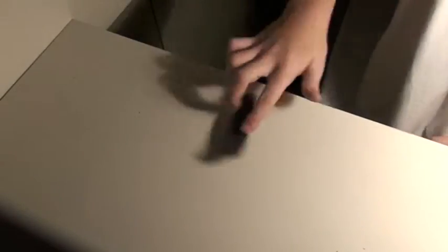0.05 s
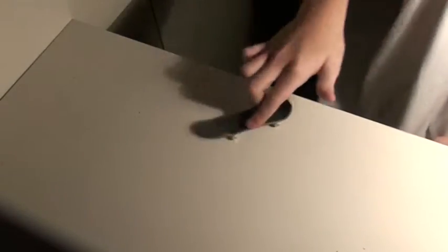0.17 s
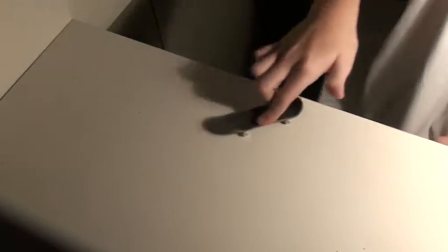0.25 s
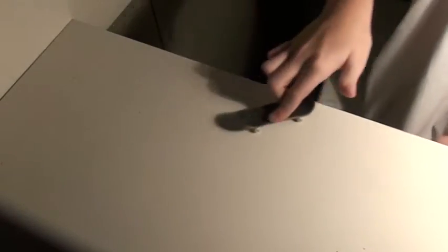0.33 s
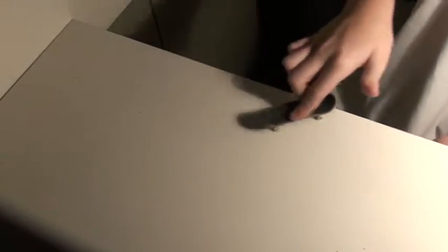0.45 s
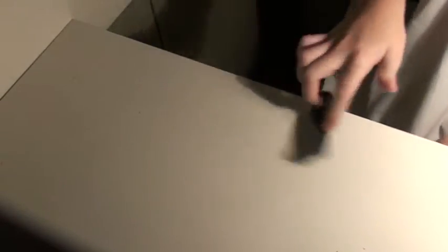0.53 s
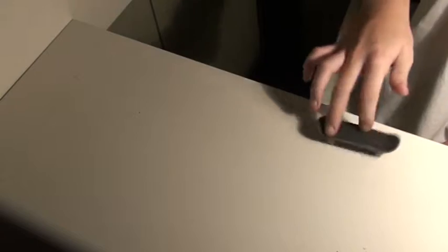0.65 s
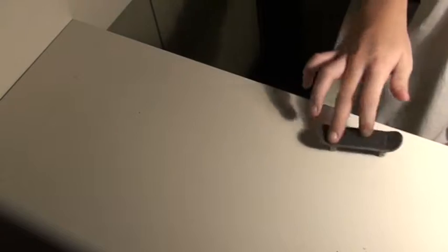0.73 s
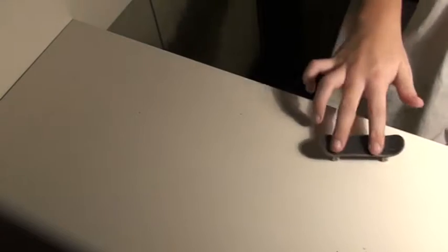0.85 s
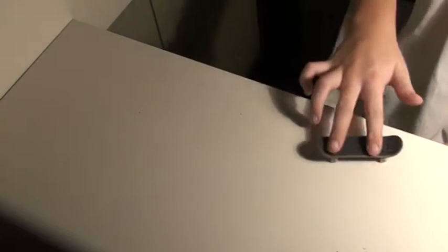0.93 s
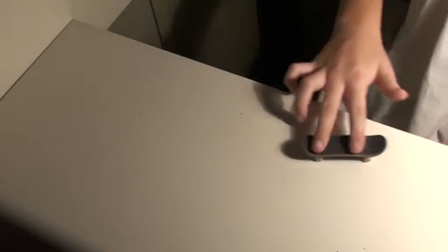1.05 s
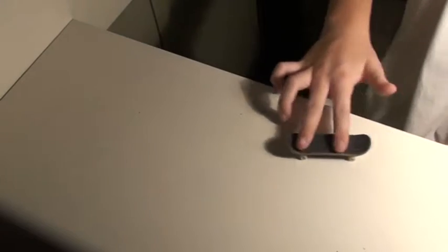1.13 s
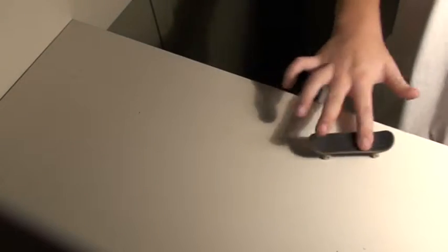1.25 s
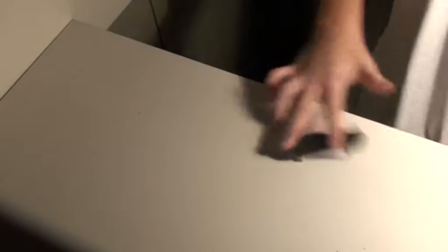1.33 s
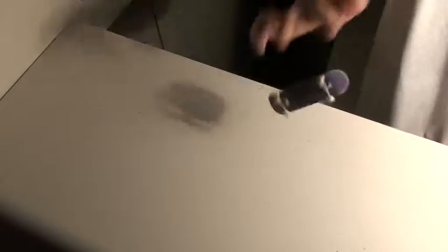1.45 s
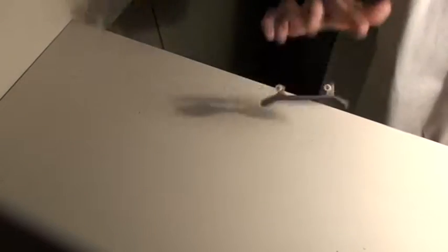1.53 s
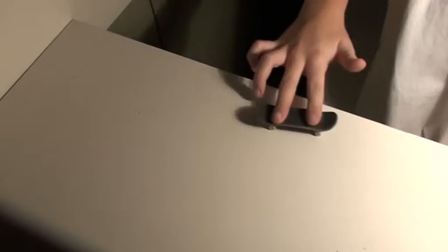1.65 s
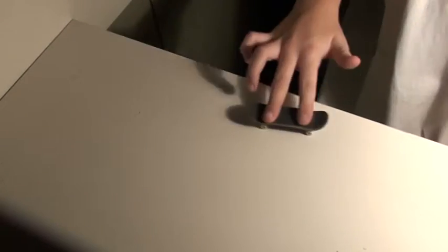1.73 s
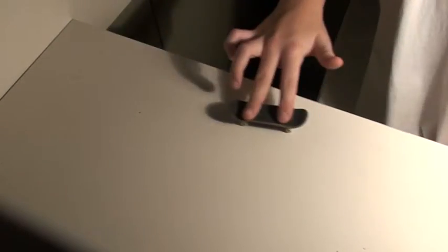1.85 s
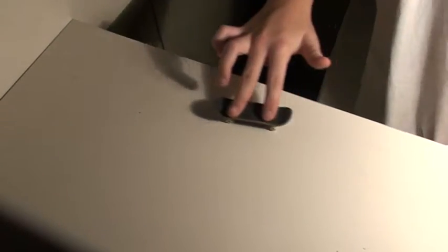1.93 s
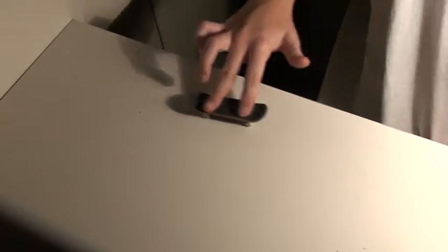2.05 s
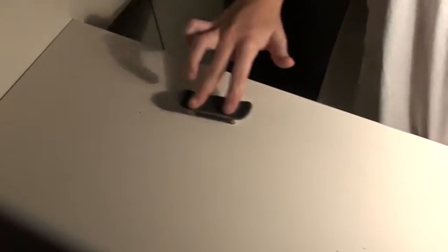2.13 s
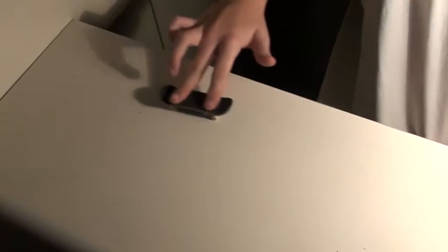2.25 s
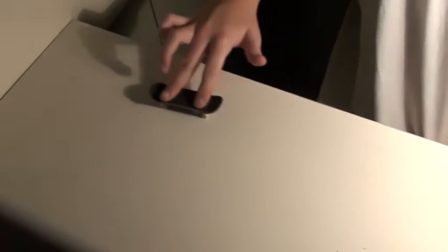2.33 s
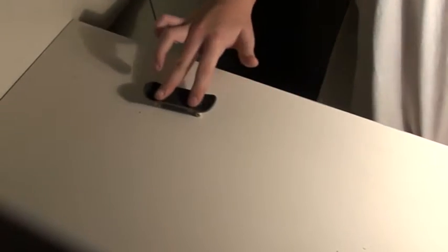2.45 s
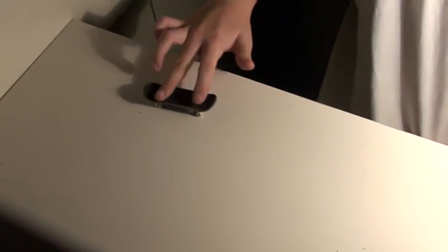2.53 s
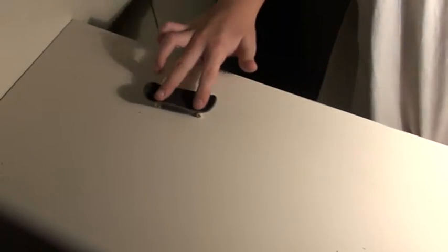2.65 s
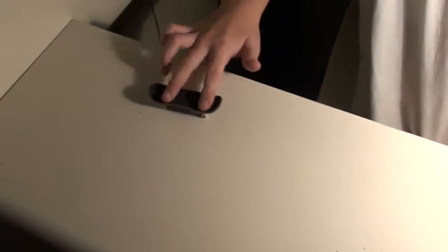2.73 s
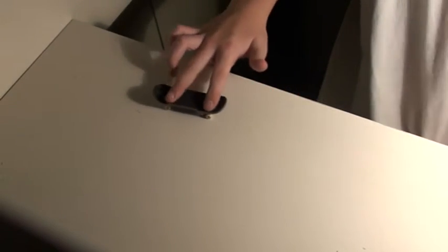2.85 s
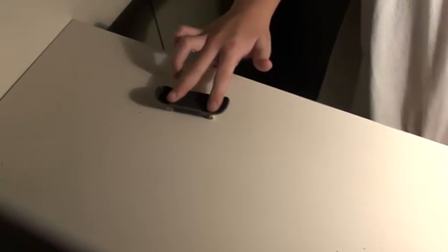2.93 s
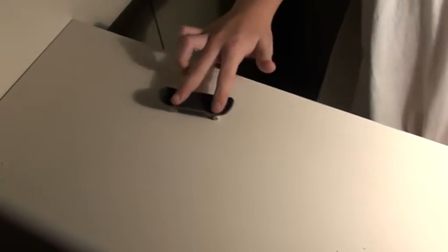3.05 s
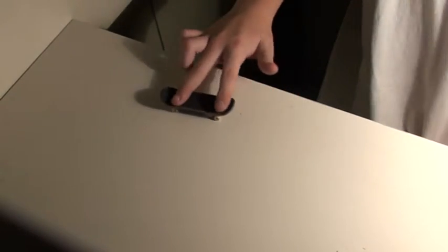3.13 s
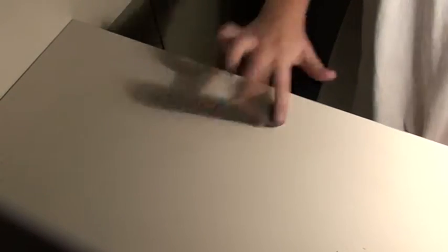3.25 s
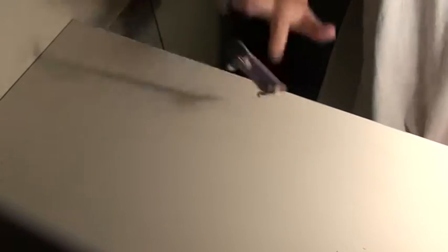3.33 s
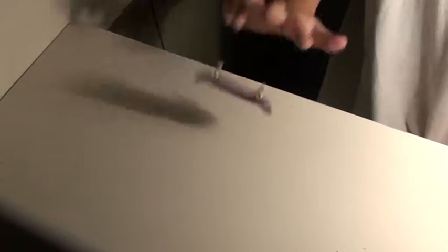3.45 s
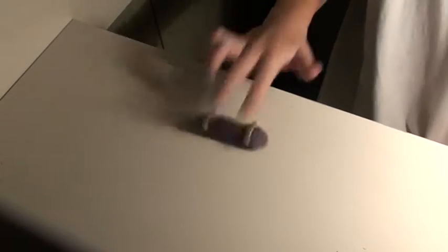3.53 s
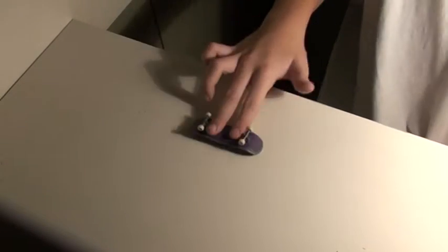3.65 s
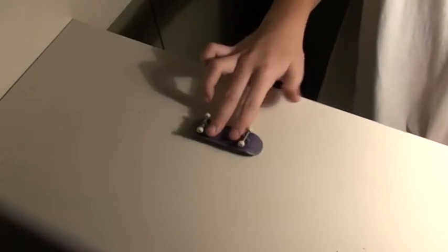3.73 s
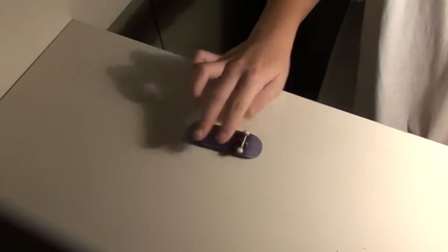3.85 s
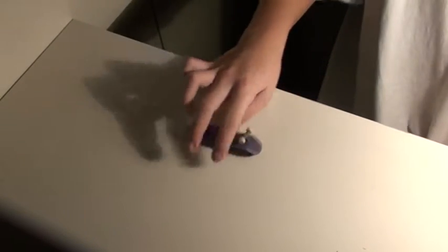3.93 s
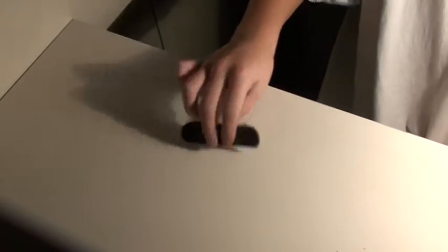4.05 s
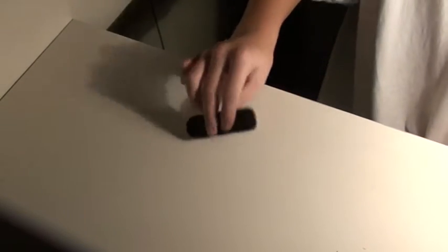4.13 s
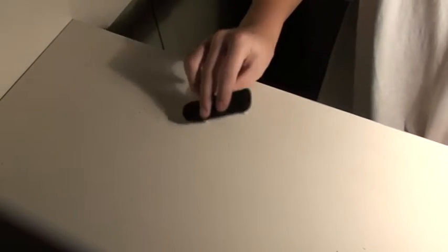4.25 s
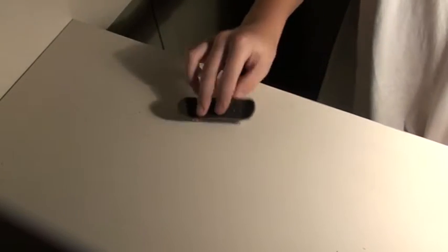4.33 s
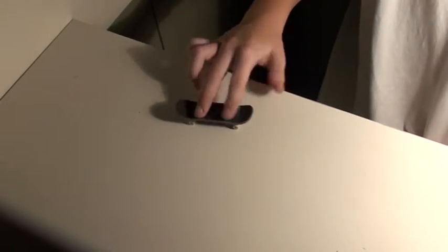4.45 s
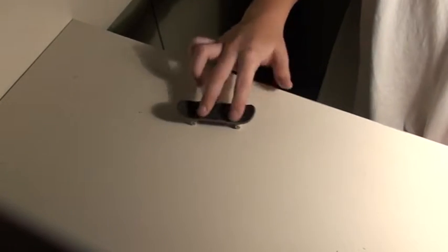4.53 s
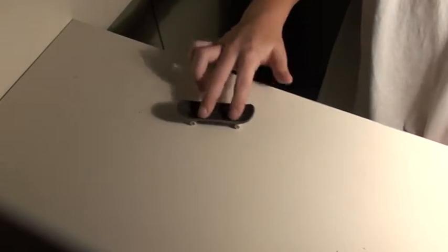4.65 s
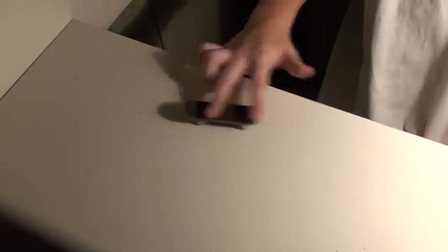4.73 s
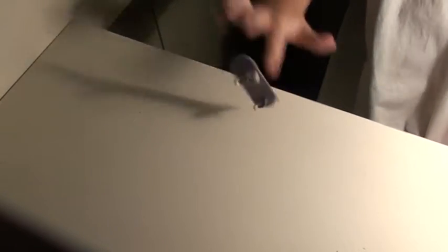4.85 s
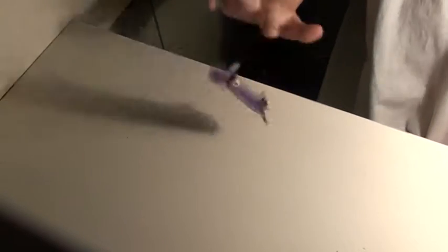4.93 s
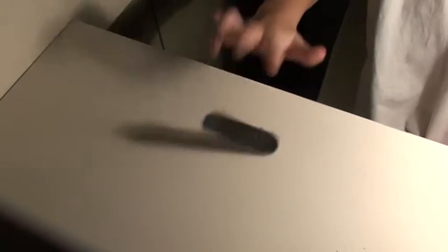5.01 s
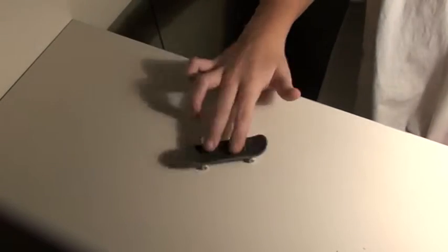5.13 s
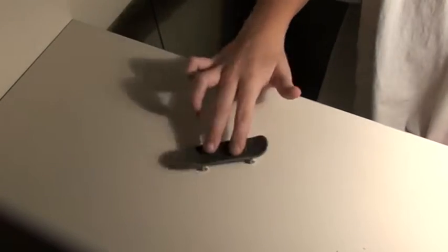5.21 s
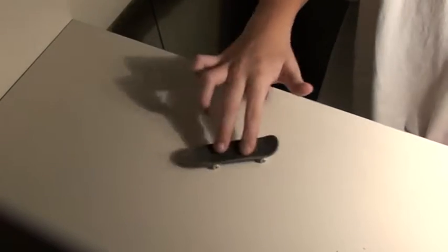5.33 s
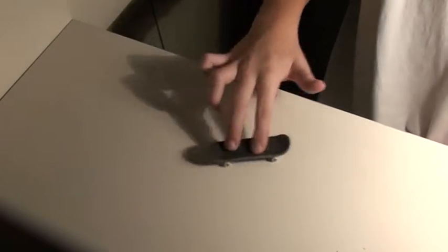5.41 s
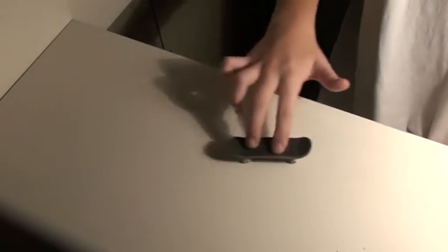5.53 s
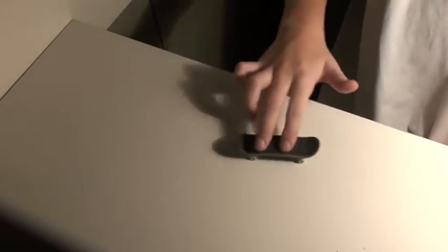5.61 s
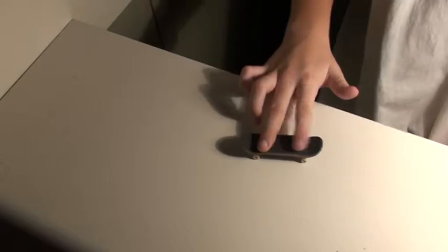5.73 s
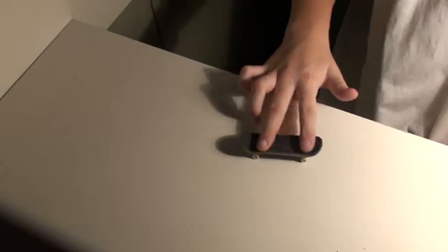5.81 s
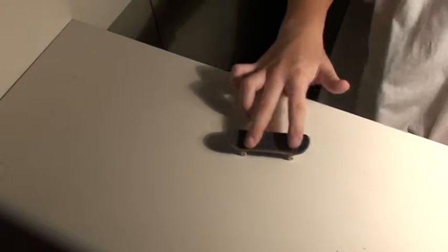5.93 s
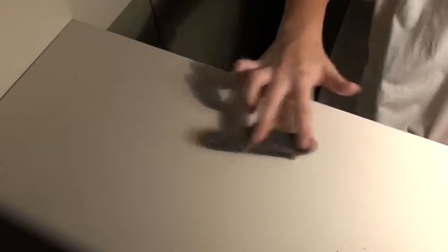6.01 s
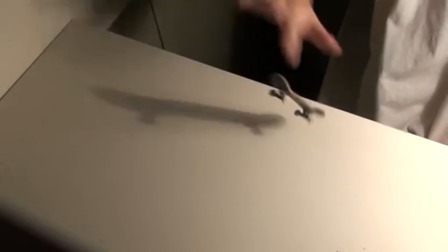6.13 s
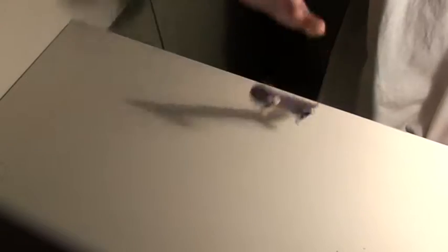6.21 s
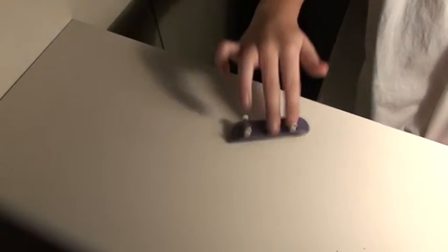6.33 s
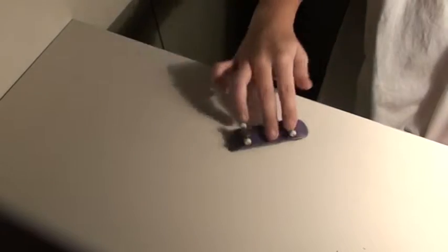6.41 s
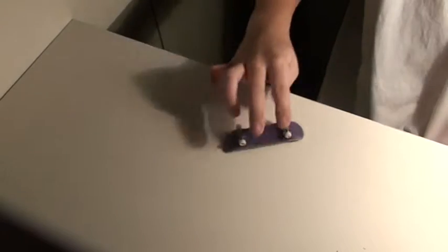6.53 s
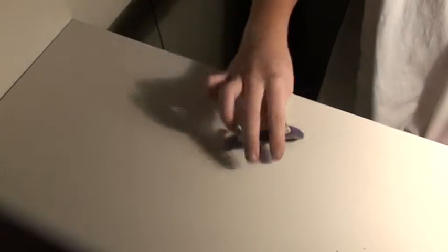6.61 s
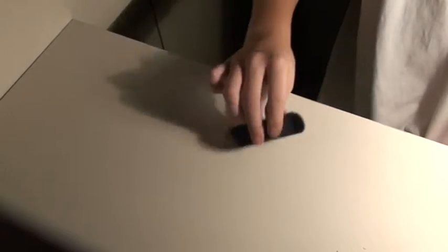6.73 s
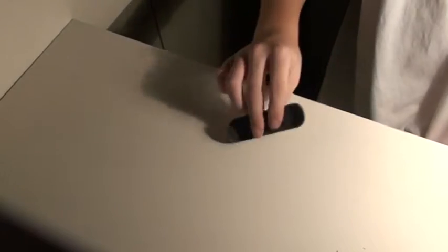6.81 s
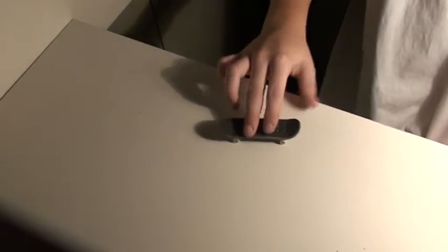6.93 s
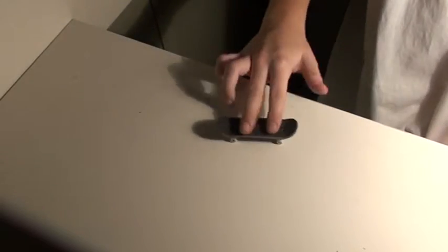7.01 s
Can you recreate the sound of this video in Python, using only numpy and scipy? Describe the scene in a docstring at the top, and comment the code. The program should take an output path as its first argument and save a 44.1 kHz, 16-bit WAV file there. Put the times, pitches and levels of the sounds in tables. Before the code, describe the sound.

A miniature skateboard is flipped by fingers on a table. Bright, dry snaps lead to hard wooden clacks with a short low table knock; small wheels rumble and scrape faintly between them. Later landings are scattered, with quieter turning-over taps and a small metallic axle tick. Close stereo pickup, short room reflections, faint steady low hum.

```python
"""Sharp pops, wooden clatter and short rolling scuffs: a fingerboard ridden on a hard tabletop in a small room.
The tail snaps down to pop each trick, and the board clatters back; each contact rings board and table
as decaying modes and damped noise. Wheels and drags are filtered random grains, stamps and axles ring alone.
An appliance hums faintly behind as wavering sines over filtered noise for room air."""
import sys
import numpy as np
from scipy import signal
from scipy.fft import rfft, irfft, next_fast_len
from scipy.io import wavfile

SR = 44100
rng = np.random.default_rng(int(sys.argv[2]) if len(sys.argv) > 2 else 0)


def store_wav(level_fs):
    """Save 16-bit WAV to argv[1]."""
    pcm = np.round(np.clip(np.atleast_2d(level_fs), -1, 1) * 32767)
    wavfile.write(sys.argv[1], SR, pcm.T.astype(np.int16))


N = 311787
TIME = np.arange(N) / SR
AGE = TIME[:SR // 3]  # time since a blow [s]
MODE_SPREAD_DB = 4  # random spread of mode strengths from spot to spot

# table knock modes: (frequency [Hz], relative level [dB], t60 [s])
TABLE_KNOCK_MODES = [(366, -7, 0.28), (421, -12, 0.42), (642, 7.5, 0.14), (800, -11, 0.037), (886, 3, 0.2),
                     (1153, 0, 0.033)]
# deck modes: (frequency [Hz], relative level [dB], t60 [s])
DECK_RING_MODES = [(1226, -3.5, 0.086), (1276, 13.5, 0.05), (1438, 10.5, 0.03), (1654, -13, 0.03),
                   (1750, 9, 0.055), (1766, -4.5, 0.2)]


def pops():
    """The tail snaps on the table; snaps differ in force and in how freely the deck flexes."""
    # tail snaps: (time [s], force [dB], deck flex [dB])
    snap_hits = [(1.4072, -31, 0.5), (3.2981, -30, -5), (4.8285, -30, -1.5), (6.0899, -30, 11)]
    # table thump, table knock, deck ring, deck clack, hard click: (level above force [dB])
    part_levels_db = np.array([-5, -5, -8, -7, 3])
    # hard click of the tail: (frequency [Hz], gain [dB])
    snap_spectrum = [(2600, -5), (3600, -5), (4200, 1), (5400, -3.5), (6400, 3.5), (7700, 4), (9500, -5),
                     (12000, -9.5), (14000, -19), (16000, -28)]
    # tail modes: (frequency [Hz], relative level [dB], t60 [s])
    tail_modes = [(3760, -11.5, .1), (6300, -11, 0.088), (7800, 1.5, .1), (8100, 25, 0.091),
                  (7600, 10, 0.11)]
    # deck flexing as its tail strikes: (frequency [Hz], relative level [dB], t60 [s])
    flex_modes = [(1340, -4, 0.07), (1436, -3, 0.051), (1620, -0.5, 0.21)]
    is_deck_ring = np.arange(len(part_levels_db)) == 2
    hits = [(time_s, force_db + part_levels_db + flex_db * is_deck_ring)
            for time_s, force_db, flex_db in snap_hits]
    return blows(hits, snap_spectrum, tail_modes, click_t60=0.21, click_ring_db=-20,
                 deck_modes=flex_modes, deck_ring_db=-3.0, crack=1.4)


def clacks():
    """Hard contacts click, flat wooden ones knock and ring; the deck edge sounds higher than its middle."""
    # board meets table: (time [s], force [dB], hardness [dB], spot [dB])
    # hardness: + wheels and axles, - flat wood; spot: + edge of the deck, - its middle
    clack_hits = [(0.027, -34, 5.5, -0.5), (0.033, -30.5, 5.5, 3.5), (0.056, -29, 3, -1.5),
                  (0.066, -30, -4.5, -1), (0.075, -38.5, -4, 0), (0.084, -31.5, -2.5, 1.5),
                  (0.494, -48.5, 1.5, 2), (0.896, -52, -8.5, 3.5), (1.049, -54, -6, 1.5),
                  (1.338, -49.5, -17, -2), (1.352, -49, -14, -9), (1.371, -47.5, -5.5, -10),
                  (1.638, -31.5, 6, -4.5), (1.653, -30, 2, 0.5), (1.664, -32, -6.5, 0),
                  (2.176, -59, 4, 4.5), (2.29, -67, -2, 4), (2.394, -61, -3, 2), (2.538, -53, -2, -2),
                  (2.677, -44, -7.5, 0.5), (2.897, -66.5, -4, -4), (3.227, -53.5, 2, 4.5),
                  (3.563, -28, -4, 1.5), (3.599, -27.5, 0.5, -0.5), (3.611, -30.5, -9, 4),
                  (3.984, -59, -1, 1.5), (4.005, -56.5, 1.5, 2), (4.081, -36, -3, 0),
                  (4.392, -38, 7.5, -0.5), (4.413, -32, -1.5, -2.5), (5.063, -28, -3.5, 1),
                  (5.095, -34.5, 11, -2), (5.137, -37.5, 18, -5), (5.147, -31.5, 4.5, -0.5),
                  (5.703, -60.5, 4.5, 3), (6.297, -32.5, -11, 6), (6.33, -29, -5.5, -3), (6.382, -32, 3, 5),
                  (6.394, -36, -11.5, 4), (6.654, -54.5, -4, 4.5), (6.662, -47, 5, 1),
                  (6.724, -53, -2, -0.5), (6.747, -34.5, -1, -3.5), (6.81, -51, 3, 5.5),
                  (6.914, -34, 3.5, 0), (6.946, -37, -1.5, -2)]
    # table thump, table knock, deck ring, deck clack, hard click:
    # (level above force [dB], gain per hardness [dB/dB], gain per spot [dB/dB])
    part_table = [(-8.5, -0.02, 0.5), (-5.5, -.85, 0), (-1.5, -0.74, -.8), (-5, -0.08, 1.15), (2, .5, 0)]
    # hard click: (frequency [Hz], gain [dB])
    click_spectrum = [(2600, -41), (3500, -1.5), (4200, 2.5), (5400, -0.5), (6800, 1.5), (8500, 0.5),
                      (10000, -5), (12500, -7), (14000, -20.5), (16000, -19)]
    # wheel and axle modes: (frequency [Hz], relative level [dB], t60 [s])
    truck_modes = [(3520, -12, 0.033), (4030, -4, 0.38), (4560, 1, .08), (6170, -9.5, .08),
                   (6970, 25, 0.027), (8100, 14.5, .08)]
    # light touches are slower, so they keep more of their thump
    landing_db, thump_kept_db_per_db = -29, 0.31
    part_db, per_hardness, per_spot = np.transpose(part_table)
    is_thump = np.arange(len(part_db)) == 0
    hits = []
    for time_s, force_db, hardness_db, spot_db in clack_hits:
        levels_db = force_db + part_db + per_hardness * hardness_db + per_spot * spot_db
        kept_db = thump_kept_db_per_db * (landing_db - force_db)
        hits.append((time_s, levels_db + is_thump * kept_db))
    return blows(hits, click_spectrum, truck_modes, click_t60=0.12, click_ring_db=-26.0,
                 deck_modes=DECK_RING_MODES, deck_ring_db=-4.5, crack=0.3)


def blows(hits, click_spectrum, click_modes, click_t60, click_ring_db, deck_modes, deck_ring_db, crack):
    """Every contact sounds five parts: table thump, table knock, deck ring, deck clack and hard click."""
    # crowded resonances of table knock, deck ring, deck clack: (frequency [Hz], gain [dB])
    knock_spectrum = [(230, -31.5), (310, -8.5), (390, -0.5), (520, -0.5), (680, 3), (950, -0.5),
                      (1150, -14), (1500, -34)]
    body_spectrum = [(900, -14.5), (1150, 5), (1350, 8), (1650, 3), (1950, 3), (2400, -55)]
    clack_spectrum = [(1500, -17), (2000, 1.5), (2400, -2.5), (2900, -2), (3500, -6), (4500, -44.5)]
    out = np.zeros((2, N))
    for time_s, parts_db in hits:
        touch = contact(time_s, rise_s=0.00045, held_db=-10.5, choke_s=0.013)
        click = crowd(click_spectrum, click_t60, crack, linger_db=-10, linger_t60=0.3)
        click = click + from_db(click_ring_db) * ring(click_modes, MODE_SPREAD_DB)
        deck_ring = struck(body_spectrum, t60=.1, modes=deck_modes, ring_db=deck_ring_db)
        parts = [thump(),
                 struck(knock_spectrum, t60=.14, modes=TABLE_KNOCK_MODES, ring_db=-9.5),
                 unit_blow(touch * deck_ring),
                 unit_blow(touch * crowd(clack_spectrum, t60=0.13)),
                 unit_blow(touch * click)]
        add(out, time_s, np.tensordot(from_db(parts_db), parts, axes=1))
    return out


def contact(time_s, rise_s, held_db, choke_s):
    """A blow swells for a moment as the parts meet; fingers resting on the board choke its ring."""
    # board tumbles free of the fingers: (start [s], end [s])
    free_spans = [(0, 0.12), (1.6, 1.72), (3.53, 3.66), (5.03, 5.2), (6.27, 6.43)]
    free = any(start <= time_s <= end for start, end in free_spans)
    left = 1 if free else from_db(held_db)
    return (1 - np.exp(-AGE / rise_s)) * (left + (1 - left) * np.exp(-AGE / choke_s))


def thump():
    """The low boom of the tabletop, which radiates little below its lowest mode."""
    # crowded table resonances: (frequency [Hz], gain [dB])
    thump_spectrum = [(80, 1.5), (115, -4), (160, 3.5), (200, -1), (245, -9.5), (320, -16.5)]
    # table modes: (frequency [Hz], relative level [dB], t60 [s])
    thump_modes = [(124, -2, 0.084), (158.3, -3.5, 0.19), (182.6, -0.5, 0.17), (199, -6, 0.048)]
    rise_s = 0.0024  # the heavy top takes a moment to swing up
    boom = struck(thump_spectrum, t60=0.12, modes=thump_modes, ring_db=-1.5)
    boom = unit_blow(boom * (1 - np.exp(-AGE / rise_s)))
    return high_pass(high_pass(boom, hz=75), hz=75)


def stamps():
    """Soft fingertips excite only the lowest modes of the table."""
    # fingers stamp the board down: (time [s], level [dB])
    stamp_hits = [(1.341, -33), (1.64, -34.5), (1.651, -42), (1.713, -39.5), (2.676, -51), (3.611, -30),
                  (5.096, -36), (6.296, -35)]
    out = np.zeros((2, N))
    for time_s, db in stamp_hits:
        add(out, time_s, from_db(db) * thump())
    return out


def wheels(rumble_db, scuff_db, ring_db):
    """Rolling wheels drum on the table; when they slip sideways they hiss."""
    # pushes: (start [s], end [s], relative rumble level [dB], scuff relative to rumble [dB])
    push_table = [(0.082, 0.229, -40, -6), (0.187, 0.514, -50, -7), (0.479, 0.696, -40, 4),
                  (0.583, 0.748, -46.5, -4), (0.684, 0.885, -44, -5.5), (0.878, 0.99, -56.5, 1.5),
                  (1.053, 1.155, -47.5, -2), (1.105, 1.192, -43, -13), (1.216, 1.303, -42, -6),
                  (1.677, 1.771, -35, 0), (1.737, 1.908, -49.5, -7.5), (1.884, 2.126, -48.5, -9.5),
                  (2.072, 2.38, -49, -13), (2.883, 2.97, -55, -6), (3.241, 3.299, -44.5, 6),
                  (4.154, 4.383, -67.5, 11), (4.763, 4.811, -40, -0.5), (5.124, 5.201, -32, -4.5),
                  (5.367, 5.628, -48, -12.5), (5.455, 5.553, -42.5, -15.5), (5.622, 5.695, -46.5, -5),
                  (5.89, 6.035, -51, -11), (6.023, 6.116, -52, 0.5)]
    # wheel rumble: (frequency [Hz], gain [dB])
    rumble_spectrum = [(70, -37.5), (130, -6), (190, 4), (290, -15.5), (420, -3.5), (680, 2.5), (950, -3),
                       (1350, -1), (1800, -17), (2500, -18), (5000, -25)]
    # sideways scuff: (frequency [Hz], gain [dB])
    scuff_spectrum = [(1200, -1), (2200, -5), (3100, -2.5), (4100, 1), (5200, -4.5), (7500, -5),
                      (10000, -10.5), (12500, -18), (15500, -30.5)]
    level = sum(from_db([[db], [db + slip_db]]) * swell(start, end, shape=0.51)
                for start, end, db, slip_db in push_table)
    bumps = grains(per_s=1100, spread_db=1.5)
    modes = ring(TABLE_KNOCK_MODES, MODE_SPREAD_DB) + ring(DECK_RING_MODES, MODE_SPREAD_DB)
    ringing = rms_one(signal.fftconvolve(bumps, modes)[:N])
    rumble = rms_one(coloured(bumps, rumble_spectrum) + from_db(ring_db) * ringing)
    scuff = coloured(grains(per_s=4300, spread_db=2), scuff_spectrum)
    # the wheels bite unevenly, and the weight of the fingers wanders
    grip = from_db(1.8 * drift(60) + 1.5 * drift(20))
    return grip * (from_db(rumble_db) * level[0] * rumble + from_db(scuff_db) * level[1] * scuff)


def drags():
    """The board sticks and slips under the fingers in a swell of tiny knocks."""
    # drags: (start [s], end [s], level [dB])
    drag_table = [(0.77, 0.853, -44), (1.23, 1.311, -45), (1.333, 1.387, -34), (3.234, 3.3, -37),
                  (4.037, 4.115, -44.5), (4.758, 4.836, -47.5)]
    # rasp of the board: (frequency [Hz], gain [dB])
    rasp_spectrum = [(350, -17), (700, 2), (1000, 2.5), (1400, 7), (1900, 2.5), (2700, -4), (4200, -10),
                     (9000, -18.5), (15000, -34)]
    level = sum(from_db(db) * swell(start, end, shape=0.6) for start, end, db in drag_table)
    return level * coloured(grains(per_s=3000, spread_db=2.5), rasp_spectrum)


def pings():
    """Some touches catch a metal axle, which rings briefly."""
    # axle strikes: (time [s], level [dB])
    ping_hits = [(6.385, -27.5), (6.562, -60), (6.656, -49), (6.723, -54)]
    # axle modes: (frequency [Hz], relative level [dB], t60 [s])
    axle_modes = [(4130, 0, .06), (4290, -3, .045), (4480, -7, .04)]
    out = np.zeros(N)
    for time_s, db in ping_hits:
        add(out, time_s, from_db(db) * ring(axle_modes, spread_db=11))
    return out


def room(x, wet_db, count=8):
    """Close reflections and a short tail, drawn afresh for each of count equal stretches."""
    # nearby surfaces: (delay [s], level [dB])
    echo_table = [(.0014, -43.5), (.0085, -31)]
    treble = high_pass(x, hz=3240)  # small surfaces throw back only the short waves
    early = sum(from_db(db) * np.roll(treble, int(delay_s * SR), axis=1) for delay_s, db in echo_table)
    late = np.zeros((2, N + SR))
    for stretch in np.array_split(np.arange(N), count):
        wet = signal.fftconvolve(x[:, stretch], room_tail(build_s=0.0018), axes=1)
        late[:, stretch[0]:stretch[0] + wet.shape[1]] += wet
    return x + early + from_db(wet_db) * late[:, :N]


def room_tail(build_s):
    """A diffuse stereo tail of unit energy, each band dying at its own rate."""
    # room decay: (frequency [Hz], t60 [s])
    decay_table = [(150, 0.33), (500, 0.2), (1500, 0.25), (4000, 0.25), (8000, 0.23), (14000, 0.18)]
    age = TIME[:SR // 2]
    edges_hz = np.geomspace(60, 18000, 11)
    spectrum = rfft(stereo_noise(len(age), side_db=-9.5))
    bins_hz = np.fft.rfftfreq(len(age), 1 / SR)
    hz, t60 = np.transpose(decay_table)
    tail = 0
    for low, high in zip(edges_hz, edges_hz[1:]):
        band = irfft(spectrum * (bins_hz >= low) * (bins_hz < high), len(age))
        band_t60 = np.interp(np.log(low * high) / 2, np.log(hz), t60)
        tail = tail + band * from_db(-60 * age / band_t60)
    return rms_one(tail * (1 - np.exp(-(age / build_s) ** 2))) / np.sqrt(len(age))


def background(hum_db, waver_db):
    """A slightly unsteady motor hum over the quiet air of the room."""
    # hum lines: (frequency [Hz], relative level [dB])
    hum_lines = [(91.5, -54), (199.2, -69), (473.7, -63), (667.5, -72), (1884, -73)]
    # room air: (frequency [Hz], gain [dB])
    air_spectrum = [(25, -23), (48, -14), (65, -11.5), (88, -0.5), (115, -9), (190, -7), (280, -14.5),
                    (460, -13.5), (700, -12.5), (1800, -21), (4000, -27.5), (8000, -34), (11000, -39.5),
                    (16000, -38)]
    air_db = -59
    hum = 0
    for hz, db in hum_lines:
        waver, phase_rad = drift(16), .4 * drift(16)
        hum = hum + from_db(db + waver_db * waver) * np.sin(2 * np.pi * hz * TIME + phase_rad)
    air = coloured(stereo_noise(N, side_db=-8), air_spectrum)
    return from_db(hum_db) * hum + from_db(air_db) * air


def ring(modes, spread_db):
    """Each blow lands on another spot, so each decaying mode gets a random strength and sign."""
    hz, db, t60 = np.transpose(modes)[:, :, None]
    strength = from_db(db + spread_db * rng.standard_normal(db.shape)) * rng.choice([-1, 1], db.shape)
    decay = from_db(-60 * AGE / t60)
    return unit_blow(np.sum(strength * decay * np.sin(2 * np.pi * hz * AGE), axis=0))


def crowd(spectrum, t60, crack=0.14, linger_db=-18, linger_t60=0.37, crack_s=0.00088):
    """Resonances too close to tell apart: a crack at contact, a quick decay, a faint diffuse afterglow."""
    direct = from_db(-60 * AGE / t60) + crack * np.exp(-(AGE / crack_s) ** 2)
    afterglow = from_db(linger_db - 60 * AGE / linger_t60)
    noise = coloured(stereo_noise(len(AGE), side_db=-17.0), spectrum)
    return unit_blow(noise * np.hypot(direct, afterglow))


def struck(spectrum, t60, modes, ring_db):
    """A short crack of crowded resonances, out of which a few clear modes ring on."""
    return unit_blow(crowd(spectrum, t60) + from_db(ring_db) * ring(modes, MODE_SPREAD_DB))


def grains(per_s, spread_db):
    """Tiny bumps of uneven size and random sign at random moments."""
    sizes = from_db(spread_db * np.minimum(rng.exponential(1, N), 4)) * rng.choice([-1, 1], N)
    return sizes * (rng.random(N) < per_s / SR)


def swell(start, end, shape):
    """Rises from rest and comes back to rest: half a sine raised to the power shape."""
    return np.abs(np.sin(np.pi * np.clip((TIME - start) / (end - start), 0, 1))) ** shape


def drift(rate_hz):
    """A slow random wander through normal knots of spread 1, rate_hz knots per second."""
    knots = rng.standard_normal(1024)
    return np.interp(TIME * rate_hz, np.arange(len(knots)), knots)


def stereo_noise(size, side_db):
    """Diffuse sound on two closely spaced microphones: shared noise plus opposed side noise."""
    mid, side = rng.standard_normal((2, size))
    return mid + from_db(side_db) * side * [[1], [-1]]


def from_db(db):
    """Decibels to amplitude ratio."""
    return 10 ** (np.asarray(db) / 20)


def rms_one(x):
    """Scales to rms 1."""
    return x / np.sqrt(np.mean(x ** 2) + 1e-20)


def unit_blow(x):
    """Scales a ring to rms 1 over its first 20 ms."""
    return x / np.sqrt(np.mean(x[..., :SR // 50] ** 2) + 1e-20)


def shaped(x, spectrum):
    """Filters by gains (frequency [Hz], gain [dB]), -80 dB beyond both ends."""
    hz, db = np.transpose(spectrum)
    size = next_fast_len(x.shape[-1])
    bins_hz = np.maximum(np.fft.rfftfreq(size, 1 / SR), 1)
    gain = from_db(np.interp(np.log(bins_hz), np.log(hz), db, left=-80, right=-80))
    return irfft(rfft(x, size) * gain, size)[..., :x.shape[-1]]


def coloured(x, spectrum):
    """Filters by the spectrum, then scales to rms 1."""
    return rms_one(shaped(x, spectrum))


def high_pass(x, hz):
    """Removes the long waves, 12 dB per octave."""
    return signal.sosfilt(signal.butter(2, hz, "high", fs=SR, output="sos"), x)


def add(out, time_s, sound):
    """Mixes a sound in from time_s on."""
    start = max(int(time_s * SR), 0)
    out[..., start:start + sound.shape[-1]] += sound[..., :N - start]


def scene():
    """The board plays a little to the left of the microphones."""
    board = pops() + clacks() + stamps() + pings() + drags()
    board = board + wheels(rumble_db=-2.5, scuff_db=-6.0, ring_db=-4)
    pan = from_db(0.4 * np.array([[1], [-1]]))
    return room(board, wet_db=-10.5) * pan + background(hum_db=1.0, waver_db=0.3)


def record(dry):
    """The microphone pair filters the left-right difference, rounds the peaks and cuts the top."""
    # left-right difference passed: (frequency [Hz], gain [dB])
    width_gains = [(20, 2.5), (60, -10.5), (140, -19.5), (260, 2.5), (1000, 4.5), (4000, 3.5), (8500, 4.5),
                   (10500, 11.5), (12000, -5), (17000, -7.5)]
    cutoff_hz = 16200
    mid = (dry[0] + dry[1]) / 2
    side = shaped((dry[0] - dry[1]) / 2, width_gains)
    ceiling = .48
    rounded = ceiling * np.tanh(np.array([mid + side, mid - side]) / ceiling)
    return signal.sosfilt(signal.ellip(10, .1, 80, cutoff_hz, fs=SR, output="sos"), rounded)


dry = scene()
out = record(dry)
store_wav(out)
```